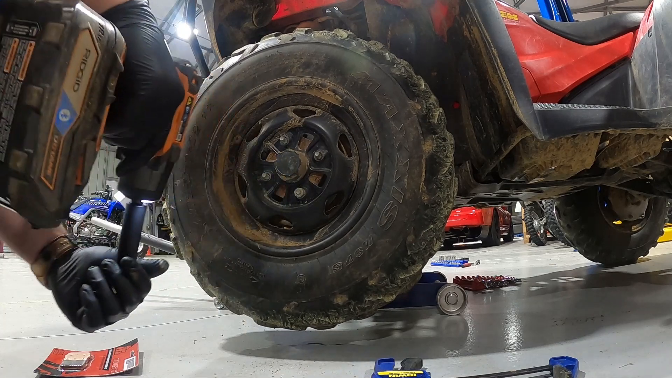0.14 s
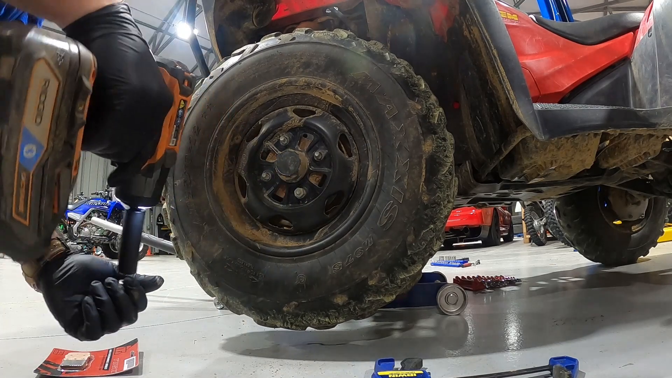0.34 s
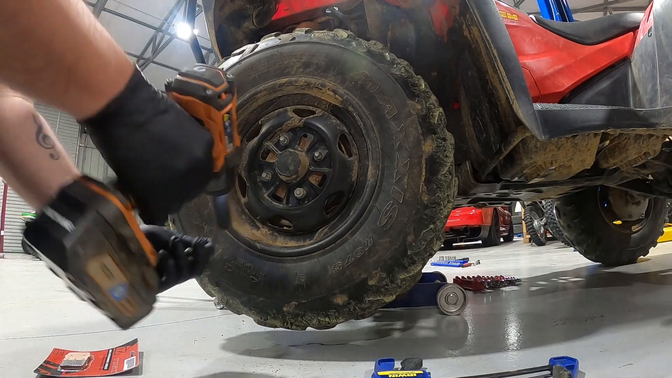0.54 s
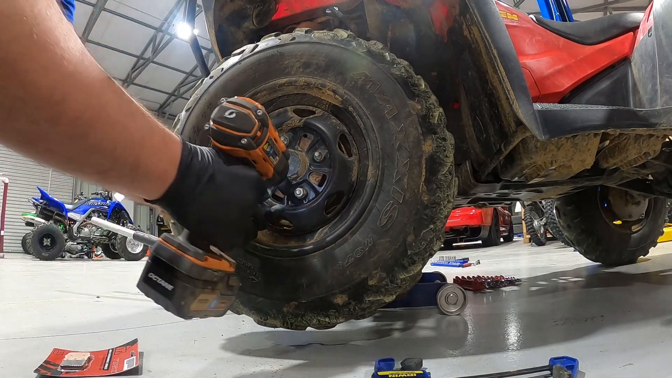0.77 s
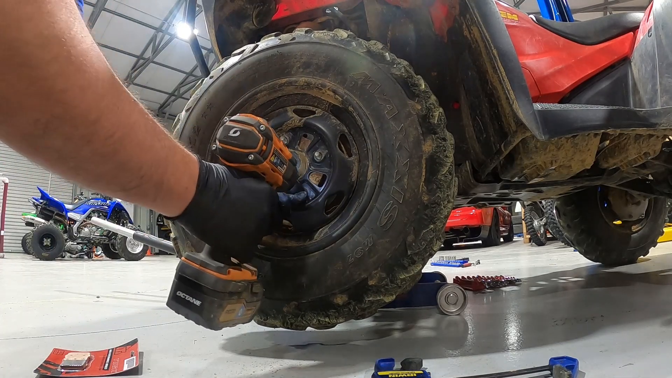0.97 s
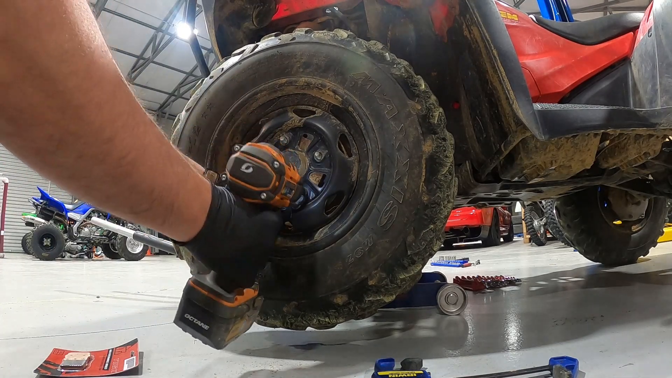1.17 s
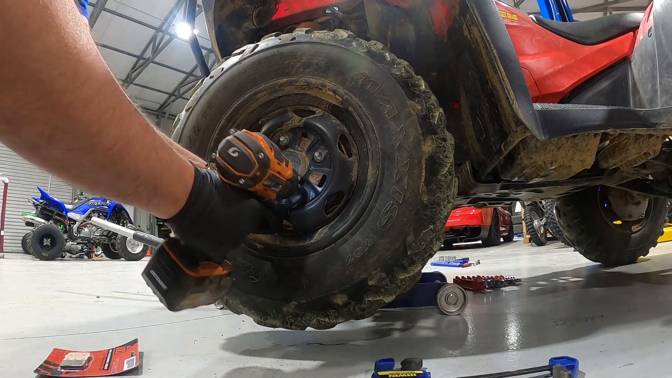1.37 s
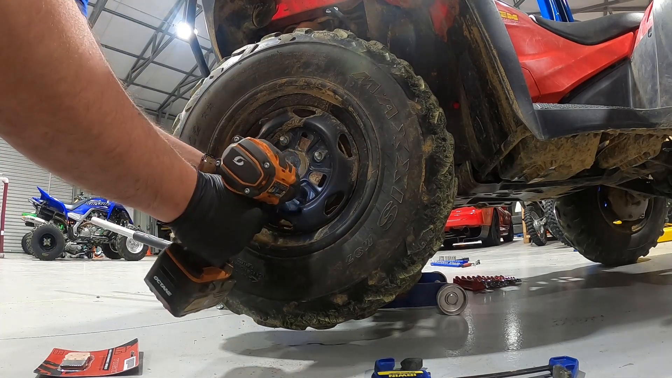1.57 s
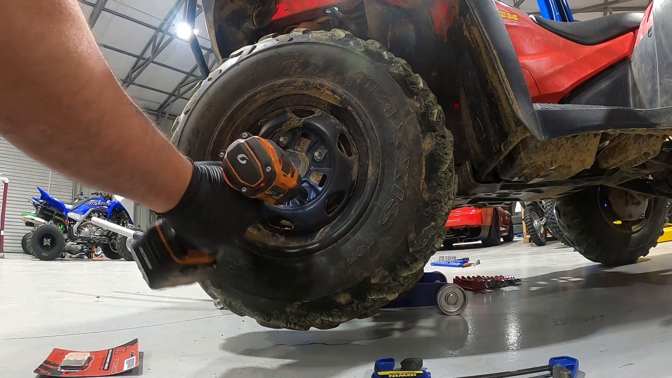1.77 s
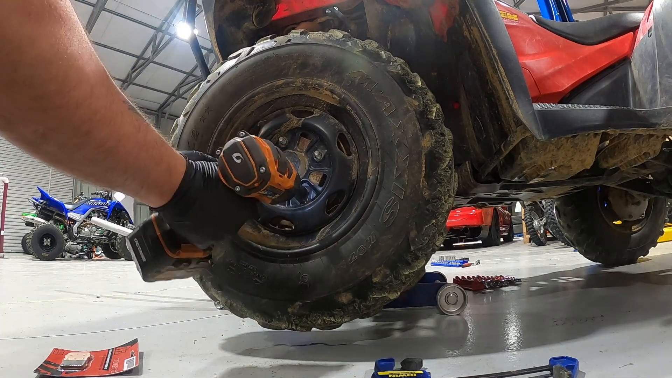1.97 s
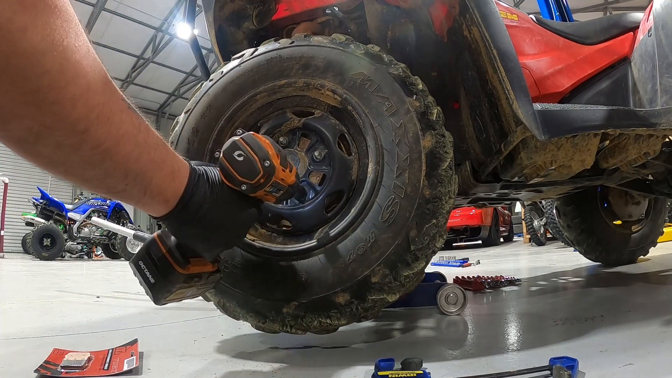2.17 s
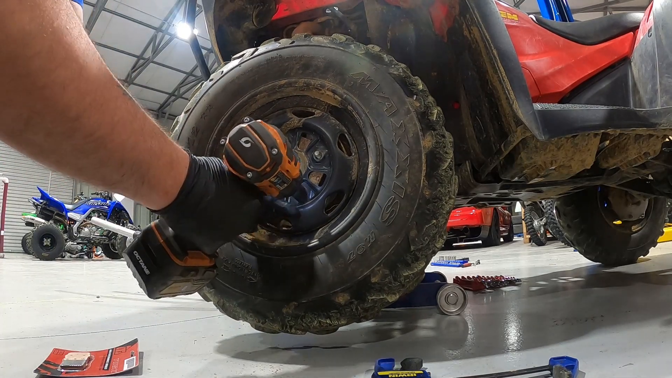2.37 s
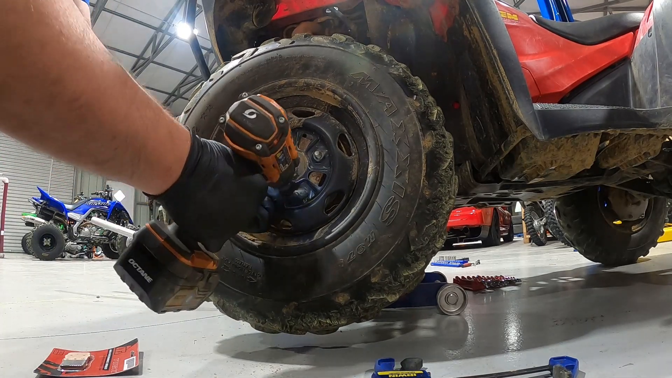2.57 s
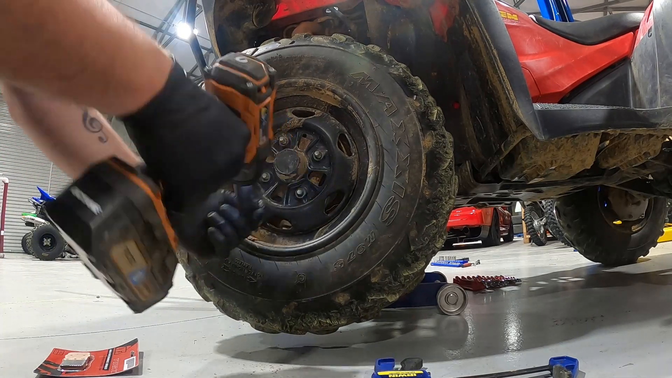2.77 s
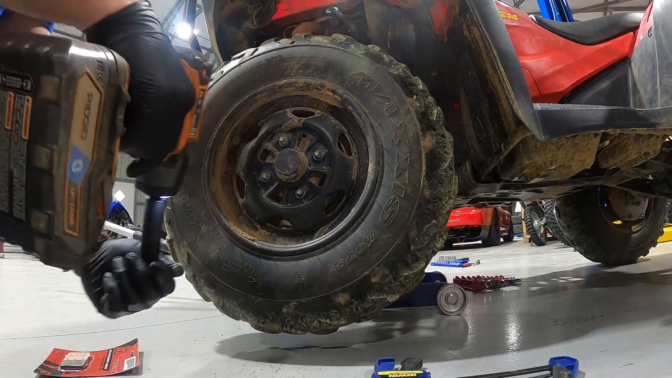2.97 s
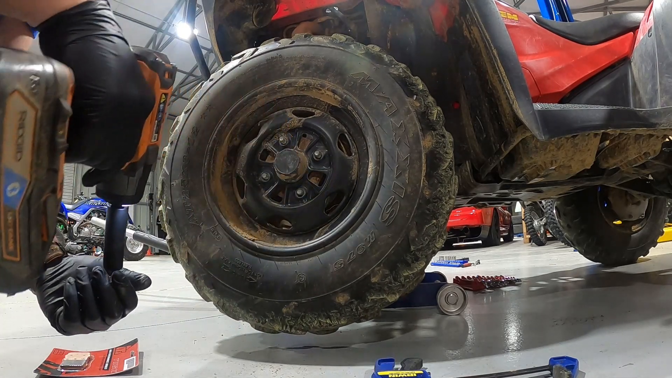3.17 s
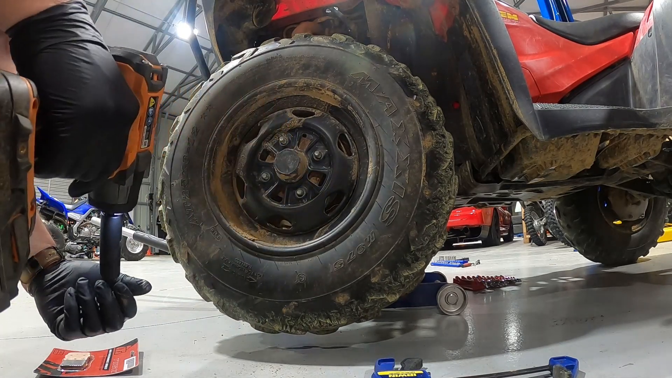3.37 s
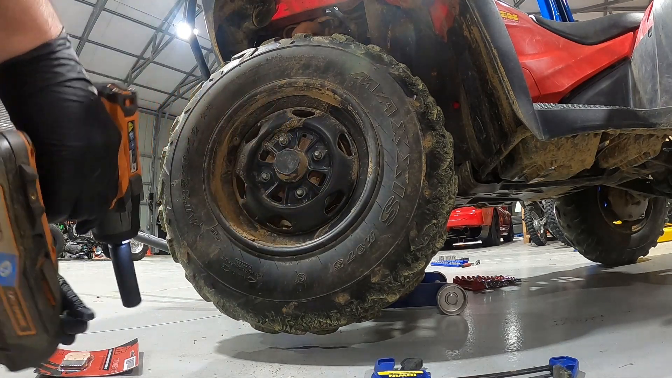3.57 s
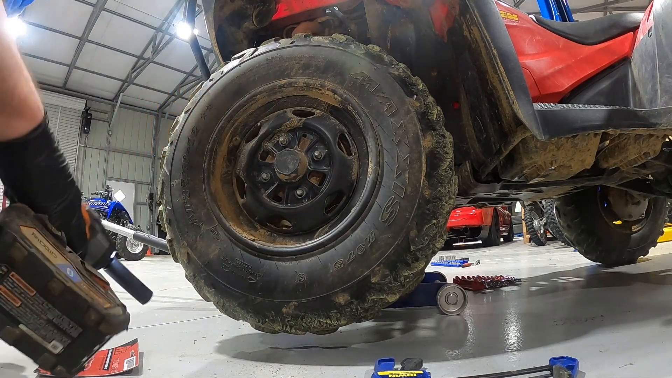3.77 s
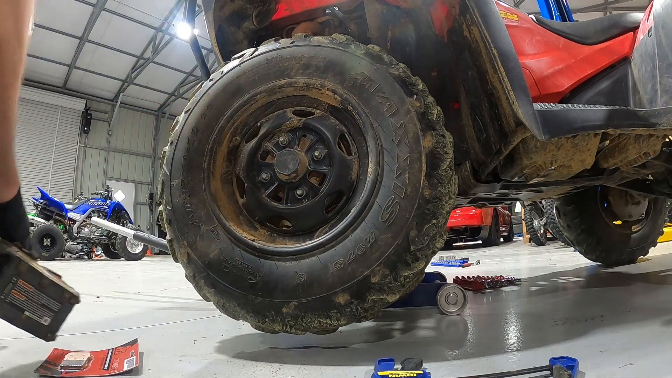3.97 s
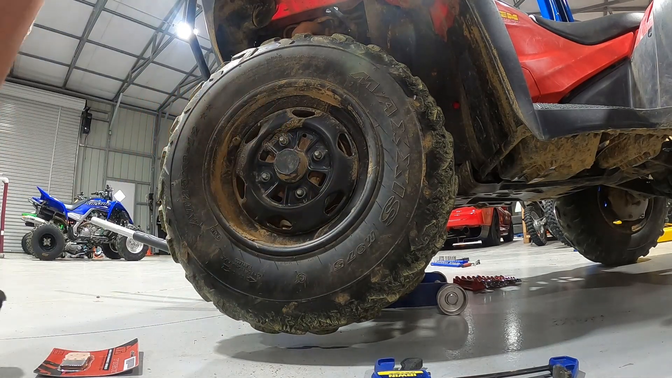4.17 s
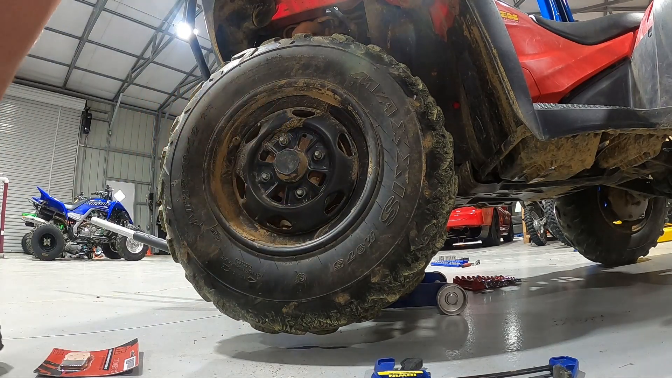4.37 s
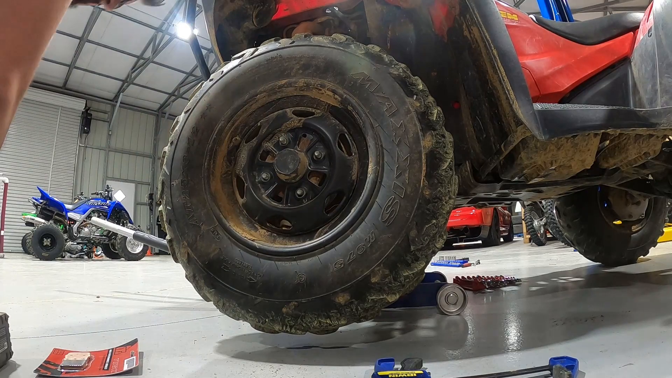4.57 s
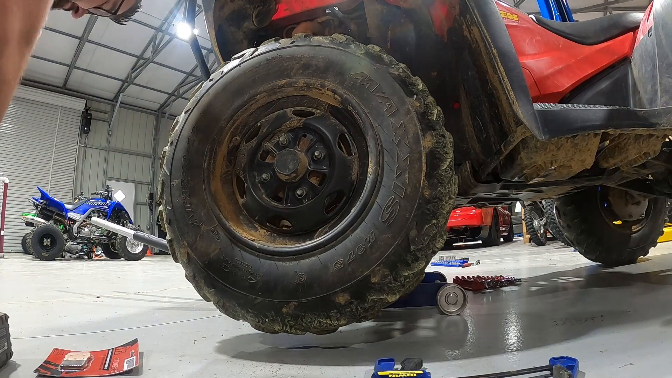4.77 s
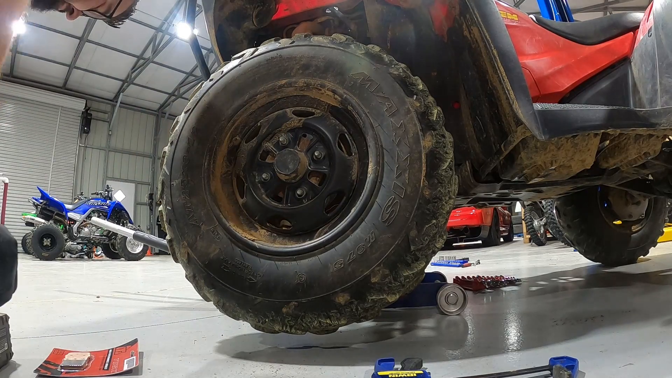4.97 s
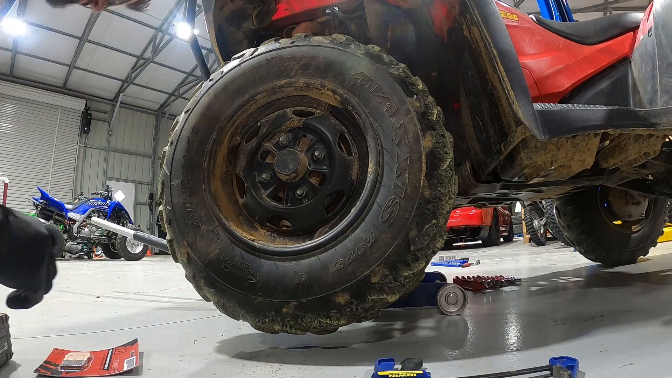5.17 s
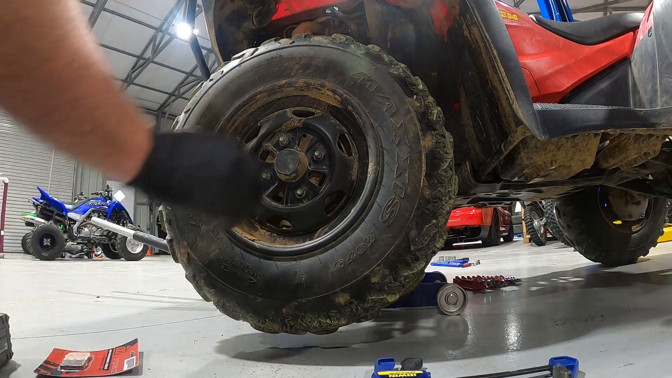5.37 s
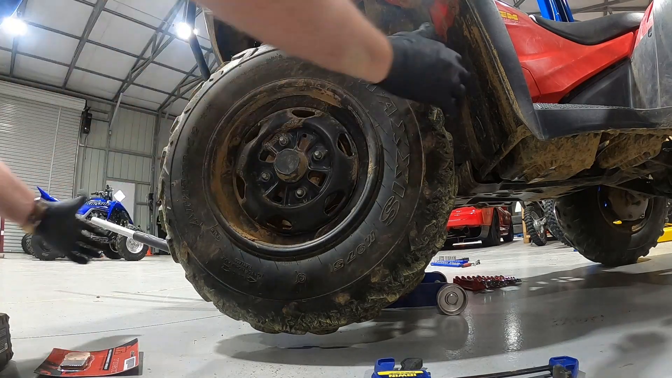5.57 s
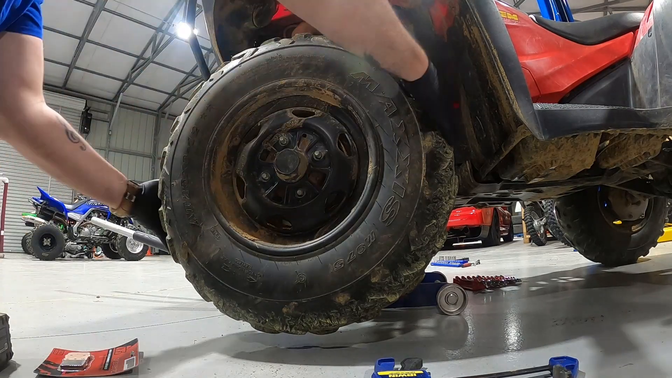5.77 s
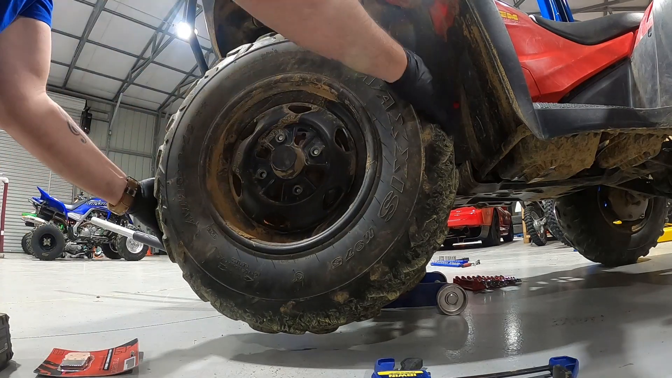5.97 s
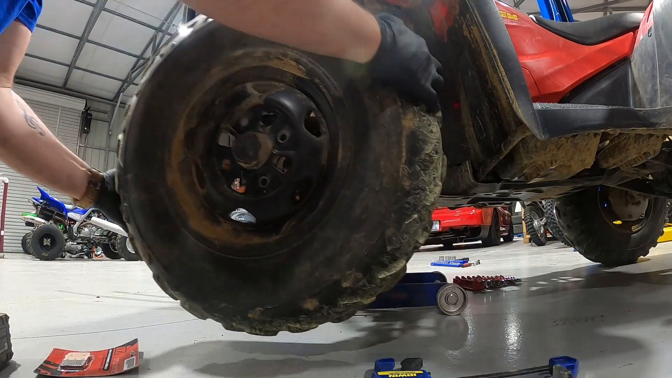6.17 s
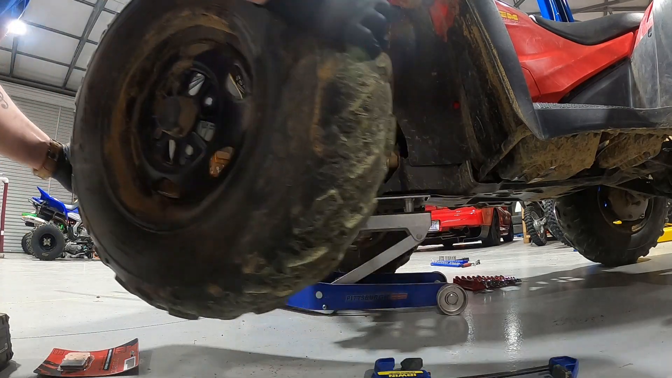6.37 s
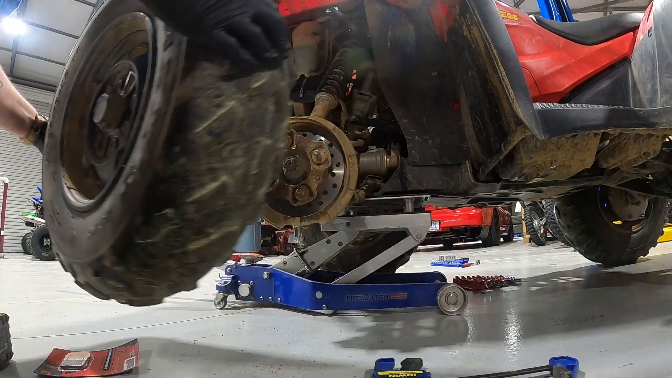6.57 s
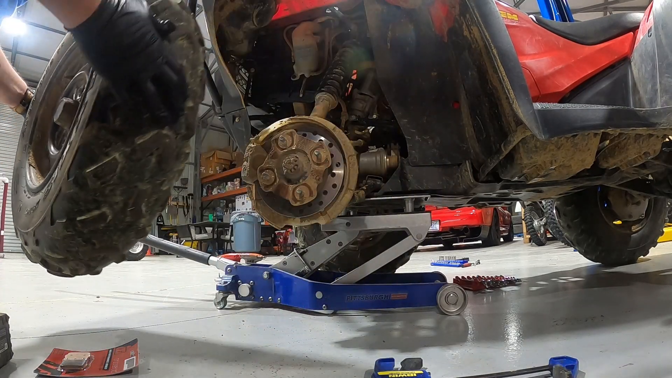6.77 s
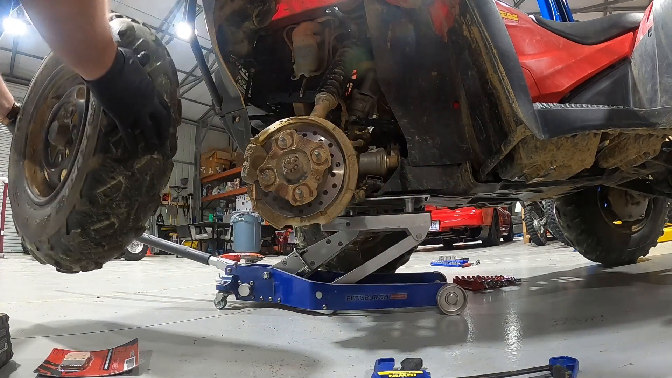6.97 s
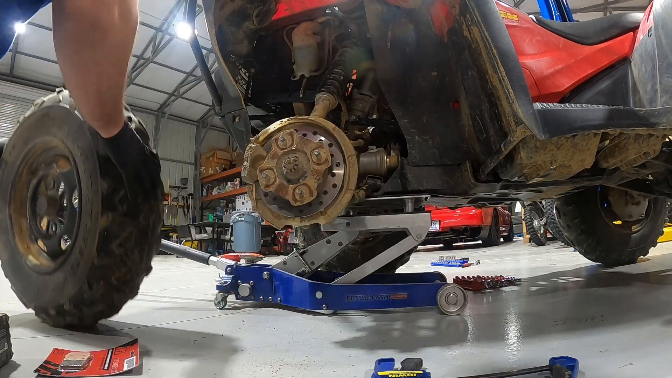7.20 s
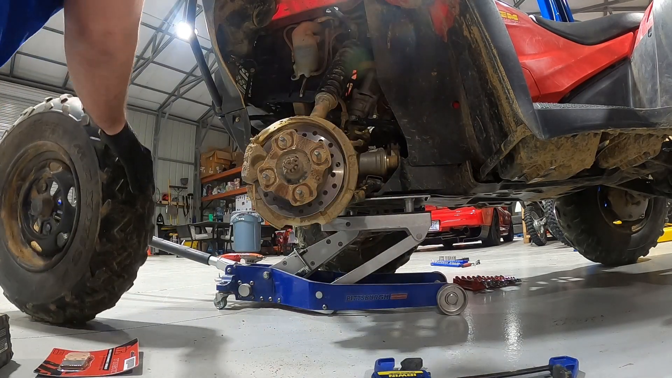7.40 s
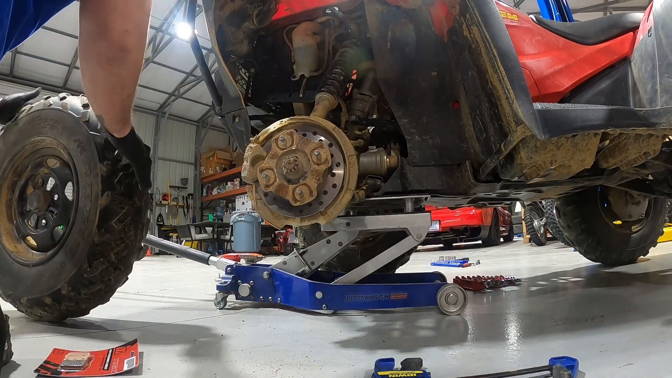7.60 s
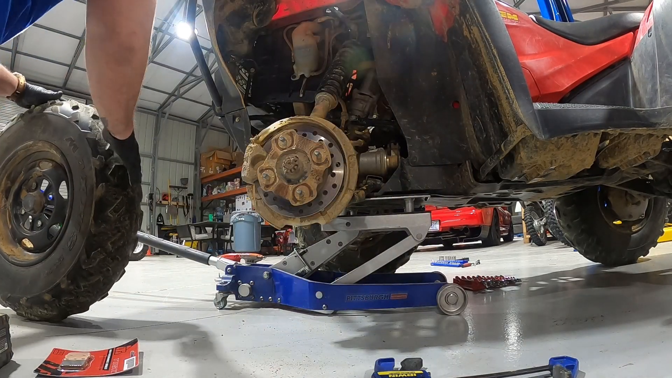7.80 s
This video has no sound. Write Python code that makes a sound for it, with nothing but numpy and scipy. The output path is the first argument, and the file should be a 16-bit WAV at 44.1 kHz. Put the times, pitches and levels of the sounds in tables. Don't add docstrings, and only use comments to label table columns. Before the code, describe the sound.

In a big garage, a cordless impact wrench clatters and gives one short hammering burst, is set down, then a loose wheel rings and thuds down.

```python
import sys
import numpy as np
from scipy import signal
from scipy.fft import rfft, irfft
from scipy.io import wavfile

SR = 44100
rng = np.random.default_rng(int(sys.argv[2]) if len(sys.argv) > 2 else 0)


def output_pcm(signal):
    pcm = np.clip(np.atleast_2d(signal).T, -1, 1) * 32767
    wavfile.write(sys.argv[1], SR, np.round(pcm).astype(np.int16))


def gain_from_db(level_db):
    decades = np.asarray(level_db, float) / 20
    return 10 ** decades


N = 345744

# (frequency [Hz], level [dB], t60 [s])
TYRE = [(101, -5, 0.038), (150, 0.5, 0.042), (194, -3.5, 0.06), (236, -4.5, 0.055), (297, -4.5, 0.046),
        (358, -9, 0.039), (391.5, -10.5, 0.045), (476, -16.5, 0.028), (250, 7.5, 0.016)]
# (frequency [Hz], density [dB/Hz])
SET_DOWN_COLOUR = [(240, -19), (400, -3.5), (888, -11.5), (1190, 2), (1590, -7), (2720, -5), (5250, -23),
                   (6710, -24.5), (15600, -74)]


def in_time(rows, outside=None):
    s, *columns = np.transpose(rows)
    return [np.interp(np.arange(N) / SR, s, c, outside, outside) for c in columns]


def held(start_s, stop_s, rise_s, fall_s):
    t = np.arange(N) / SR
    return -40 * (np.maximum(start_s - t, 0) / rise_s + np.maximum(t - stop_s, 0) / fall_s)


def rub_gain(rows, rise_s, fall_s):
    t = np.arange(N) / SR
    gain = 0
    for s, length_s, db, swell_db in rows:
        stroke_db = db + swell_db * np.clip((t - s) / length_s, 0, 1)
        gain = gain + gain_from_db(stroke_db + held(s, s + length_s, rise_s, fall_s))
    return gain


def wash_gain(rows):
    t = np.arange(N) / SR
    return sum(gain_from_db(db - 60 * np.abs(t - s) / np.where(t > s, t60_s, .03)) for s, db, t60_s in rows)


def rms_one(x):
    return x / np.sqrt(np.mean(x ** 2) + 1e-20)


def drift(rate_hz):
    r = np.exp(-80 * np.pi * rate_hz / SR)
    slow = signal.lfilter([1], [1, -2 * r, r * r], rng.standard_normal(N // 40 + 2002))[2000:]
    return np.interp(np.arange(N) / 40, np.arange(len(slow)), rms_one(slow))


def filtered(x, order, hz, kind="low"):
    return signal.sosfilt(signal.butter(order, hz, kind, fs=SR, output="sos"), x)


def colour(x, spectrum):
    hz, db = np.transpose(spectrum)
    edges_hz = np.geomspace(hz[0], hz[-1], int(2 * np.log2(hz[-1] / hz[0])) + 2)
    gains = gain_from_db(np.interp(np.log(edges_hz[1:] * edges_hz[:-1]) / 2, np.log(hz), db))
    total = 0
    for k, gain in enumerate(gains):
        total = total + (-1) ** k * gain * filtered(x + 1e-18, 2, edges_hz[k:k + 2], "band")
    return total / np.sqrt(np.sum(gains ** 2 * np.diff(edges_hz)) / (SR / 2))


def ring(x, hz, t60_s):
    r = gain_from_db(-60 / (t60_s * SR))
    w = 2 * np.pi * hz / SR
    busy = np.flatnonzero(x)
    span = slice(busy[0], busy[-1] + int(2 * t60_s * SR))
    ringing = np.zeros(len(x))
    ringing[span] = signal.lfilter([0, np.sin(w)], [1, -2 * r * np.cos(w), r * r], x[span] + 1e-18)
    return ringing


def struck(modes, at, peak_db, spread_db):
    total = np.zeros(N)
    for hz, db, t60_s in modes:
        luck = rng.standard_normal((len(at), 2))
        clicks = np.zeros(N)
        clicks[at] = gain_from_db(peak_db + db + spread_db * luck[:, 0]) * np.sign(luck[:, 1] + .6)
        total += ring(clicks, hz, t60_s)
    return total


def rim_crowd(contact):
    # (low edge [Hz], high edge [Hz], level [dB], t60 [s])
    rim_bands = [(2250, 2700, 0, .45), (3100, 3400, -9, .2), (4500, 4750, -16, .15), (5100, 5350, -15, .12),
                 (1300, 1550, -10, .25)]
    t = np.arange(SR // 2) / SR
    response = 0
    for low_hz, high_hz, db, t60_s in rim_bands:
        grain = filtered(rng.standard_normal(len(t)), 2, [low_hz, high_hz], "band")
        response = response + gain_from_db(db - 60 * t / t60_s) * rms_one(grain)
    return signal.fftconvolve(contact, response)[:N]


def blows(events, spectrum, crack_db, body, thud_db, steel=(), ring_db=0, rim_db=-120):
    s, peak_db, low_db, bright_db, contact_ms = np.transpose(events)
    at = (s * SR).astype(int)
    tilts_db = np.clip(0.57 * (bright_db - np.mean(bright_db)), -6, 6)
    t = np.arange(2000) / SR
    contact = np.zeros(N + 2000)
    for i, db, tilt_db, ms in zip(at, peak_db, tilts_db, contact_ms):
        grit = rng.standard_normal(2000)
        dull = filtered(grit, 2, 3800)
        age = 1000 * t / max(ms, .5)
        shape = age ** 1.1 * np.exp(-1.3 * age)
        shape += 0.039 * np.minimum(age, 1) * np.exp(-t / 0.022)
        contact[i:i + 2000] += gain_from_db(db) * shape * (dull * gain_from_db(-tilt_db / 2) + (grit - dull) * gain_from_db(tilt_db))
    contact = contact[:N]

    crack = np.zeros(N)
    span = slice(at.min(), at.max() + 6000)
    crack[span] = gain_from_db(crack_db) * colour(contact[span], spectrum)
    thud = struck(body, at + int(.0015 * SR), peak_db + low_db + thud_db, spread_db=4.0)
    soft_thud = filtered(thud, 2, [0.97 * body[0][0], 700], "band")
    steel_db = peak_db + ring_db + 0.8 * (bright_db - np.max(bright_db))
    total = crack + soft_thud + struck(steel, at + int(0.00087 * SR), steel_db, spread_db=3.0)
    if rim_db > -100:
        total = total + gain_from_db(rim_db) * rim_crowd(contact)
    return total


def pings(rows):
    touch = np.hanning(90)
    t = np.arange(90) / SR
    total = 0
    for s, hz, db, t60_s in rows:
        i = int(s * SR)
        push = np.zeros(N)
        push[i:i + 90] = gain_from_db(db) * touch * np.sin(2 * np.pi * hz * t) / 22
        total = total + ring(push, hz, t60_s)
    return total


def background():
    # (time [s], level [dB])
    air_levels = [(0, -56.5), (.65, -52), (1.1, -44.5), (1.9, -42.5), (1.96, -22), (2.05, -34),
                  (2.12, -37.5), (2.3, -48.5), (2.58, -58), (3.15, -52.5), (3.95, -47), (4.55, -43.5),
                  (5.0, -46), (6.0, -43), (6.6, -47.5), (7.5, -43.5), (7.84, -44.5)]
    # (frequency [Hz], density [dB/Hz])
    rumble_colour = [(8.2, -32.5), (14, -7), (49, -2.5), (85, -5), (199, -12.5), (232, -15.5), (300, -38),
                     (390, -43), (660, -120)]
    hall_colour = [(140, -35.5), (240, -0.5), (308, -4), (419, -1), (650, -13), (1370, -14), (2010, -28),
                   (2600, -25.5), (3380, -52), (5720, -120)]
    rustle_colour = [(400, -19.5), (1300, 4), (1990, -3.5), (2550, 0), (3660, -4.5), (5580, -7.5),
                     (7260, -8.5), (12500, -32), (15600, -45.5)]
    # (start [s], length [s], level [dB], swell [dB])
    glove_strokes = [(0.592, 0.14, -73, 1), (1.08, 0.2, -63, -3), (1.452, 0.18, -51, -9),
                     (3.259, 0.054, -70.5, -10), (3.643, 0.12, -67.5, -1.5), (3.726, 0.12, -59, -8.5),
                     (4.377, 0.083, -47, -13), (4.506, 0.21, -48.5, -13), (4.78, 0.11, -61.5, 7),
                     (5.378, 0.57, -83.5, 11.5), (5.82, 0.37, -57, 1), (6.122, 0.082, -49, -17),
                     (6.441, 0.2, -71, 3.5), (6.96, 0.067, -67, 0), (6.678, 0.083, -59, -6),
                     (6.865, 0.047, -63.5, 1), (7.18, 0.13, -56, 7), (7.36, 0.39, -57.5, -6.5),
                     (7.824, .05, -57.5, 1)]
    # (time [s], level [dB], t60 [s])
    wall_washes = [
        (2.57, -53.5, 0.53),
        (4.385, -43, 0.5),
        (4.525, -41, 0.4),
        (4.575, -40, 0.6),
        (7.33, -52, 0.57),
        (7.54, -56, 0.31),
    ]
    rumble_db, = in_time(air_levels)
    t = np.arange(N) / SR
    rumble = gain_from_db(rumble_db + 1.2 * drift(4)) * colour(rng.standard_normal(N), rumble_colour)
    hall_db = -57.5 + 0.93 * (rumble_db + 46.0)
    hall = gain_from_db(hall_db) * colour(rng.standard_normal(N), hall_colour)

    grains = rng.standard_normal(N) * gain_from_db(2.5 * drift(90))
    rustle_gain = gain_from_db(-74 + 0.44 * (rumble_db + 51)) + rub_gain(glove_strokes, 0.044, 0.132)
    rustle = rustle_gain * rms_one(colour(grains, rustle_colour))

    last_run = gain_from_db(-56.5 - 60 * t / 0.83)
    echo = (last_run + wash_gain(wall_washes)) * colour(rng.standard_normal(N), SET_DOWN_COLOUR)
    tone = gain_from_db(-78 + 4 * drift(30)) * np.sin(2 * np.pi * 7970 * t)
    return rumble + hall + rustle + echo + tone


def afterglow():
    # (start [s], length [s], level [dB], swell [dB])
    scuff_strokes = [(0.991, 0.019, -69, 20), (1.647, 0.018, -62, 1), (7.193, .08, -59.5, 2),
                     (7.28, 0.026, -52.5, 5.5), (7.348, 0.017, -55, -3), (7.815, .03, -61.5, 0)]
    # (frequency [Hz], density [dB/Hz])
    scuff_colour = [(1500, -13), (2500, -0.5), (4200, 2), (5600, 5), (8000, -6), (10500, -15), (15000, -40)]
    # (time [s], level [dB], t60 [s])
    floor_washes = [
        (6.13, -45, 0.91),
        (7.335, -43, 1),
        (7.54, -57, 0.37),
        (7.66, -66, .3),
    ]
    # (frequency [Hz], density [dB/Hz])
    floor_colour = [(300, -9), (600, 3), (1000, 5), (1400, 6), (2100, -15), (3200, -46), (6000, -45)]
    slide = rub_gain(scuff_strokes, 0.01, 0.04) * colour(rng.standard_normal(N), scuff_colour)
    return slide + wash_gain(floor_washes) * colour(rng.standard_normal(N), floor_colour)


def ticks():
    # (time [s], peak [dB], brightness [dB])
    tick_events = [(0.046, -44.5, -10.5), (0.586, -41.5, -25), (0.679, -53, 1), (0.719, -47, -21),
                   (2.708, -40.5, -17), (2.939, -49, 1), (3.104, -43.5, -30), (3.271, -37.5, 11),
                   (3.483, -37.5, -29), (3.643, -45.5, -21.5), (3.721, -39, -10), (3.808, -43, 5),
                   (4.069, -43.5, -17.5), (4.321, -43.5, -22), (4.777, -33, -23), (4.835, -45.5, 0),
                   (4.866, -44.5, 0), (5.836, -41, -39), (5.9, -33.5, -24), (6.444, -61, 0),
                   (6.603, -63, 5), (6.685, -41.5, 3), (6.808, -60, 0), (6.863, -57, -12), (7.562, -47, 0),
                   (6.961, -55, 7), (7.828, -47.5, -5)]
    # (frequency [Hz], density [dB/Hz])
    tick_colour = [(710, -16), (1200, -23), (1890, -1.5), (3990, -0.5), (5490, -8), (7630, -2.5),
                   (14000, -65)]
    contact_ms = 2.2
    rows = [(s, db, 0, bright_db, contact_ms) for s, db, bright_db in tick_events]
    return blows(rows, tick_colour, crack_db=-2.5, body=TYRE, thud_db=-50.0)


def set_down():
    # (time [s], peak [dB], thud re peak [dB], brightness [dB], contact [ms])
    landings = [(4.378, -24, -4.5, -19, 4.6), (4.516, -18, -2, -32, 4.6), (4.566, -16, -10.5, -23, 3.3),
                (4.601, -35, -10, -19.5, 2.2), (4.545, -34, 0, -24, 3.7), (4.583, -34.5, 10, -18, 2.6),
                (4.628, -40, 4, -19, 2.7)]
    return blows(landings, SET_DOWN_COLOUR, crack_db=7.0, body=TYRE, thud_db=-1.0)


def hub():
    # (time [s], peak [dB], thud re peak [dB])
    slips = [(5.9, -44.5, 8), (5.992, -61, 11), (6.033, -38, 6.5), (6.054, -27.5, 2), (6.064, -17, 6.5),
             (6.074, -13, -2), (6.083, -12.5, 2), (6.091, -10.5, 2.5), (6.098, -8, -2.5), (6.103, -9.5, 1),
             (6.11, -11, -12.5), (6.116, -9, -3), (6.122, -16.5, -9), (6.13, -23, 3), (6.137, -34, -1),
             (6.146, -28, 13.5), (6.158, -36, 14)]
    # (frequency [Hz], density [dB/Hz])
    hub_colour = [(240, -33), (400, -11), (569, 15.5), (1080, 4.5), (1210, -11.5), (1380, 4), (2370, 3),
                  (3580, -16), (4050, -12.5), (11300, -32), (15600, -78.5)]
    # (frequency [Hz], level [dB], t60 [s])
    loose_rim_modes = [(691, -6, .3), (810, -7, 0.33), (1050, -7, 0.11), (1378, -4.5, 0.46),
                       (1430, -29, 0.31), (1413, 7, 0.11), (1886, -12, 0.16), (2650, -25, .4),
                       (2740, -22, .3), (3460, -3, 0.055), (3590, -3.5, .04), (4021, -29, 0.15),
                       (4597, -17, 0.12), (5502, -16, 0.091)]
    contact_ms = 2.34
    rows = [(s, db, low_db, 0.24 * db, contact_ms) for s, db, low_db in slips]
    return blows(rows, hub_colour, crack_db=0.0, body=TYRE[1:], thud_db=-5.5,
                 steel=loose_rim_modes, ring_db=-19.5)


def bounce():
    # (time [s], peak [dB], thud re peak [dB], brightness [dB], contact [ms])
    bounces = [(7.3185, 2.5, -11, -18, 0.6), (7.322, -3.5, -13, -21, 0.98), (7.328, -5.5, -17, -22, 1),
               (7.359, -27.5, 16, -28, 1.2), (7.517, -14, 3.5, -52, 0.81), (7.531, -5, -7.5, -27, 0.96),
               (7.535, -10.5, -16, -31, 1.5), (7.616, -27, -14, -74.5, 1.1), (7.657, -25.5, 6.5, -55, 1.4),
               (7.686, -33.5, 10, -44, 1.04)]
    # (frequency [Hz], density [dB/Hz])
    bounce_colour = [(150, -46), (250, 0), (544, -7.5), (647, 4.5), (1230, -8), (1700, -12), (2820, -30),
                     (7680, -56), (15600, -78)]
    # (frequency [Hz], level [dB], t60 [s])
    floor_tyre_modes = [(37.6, -3, 0.21), (56, -6.5, 0.19), (81.3, -4, 0.17), (103, -6, 0.14),
                        (168, -5, 0.055)]
    return blows(bounces, bounce_colour, crack_db=-2.0, body=floor_tyre_modes, thud_db=-9.5)


def wheel_pings():
    # (time [s], frequency [Hz], peak [dB], t60 [s])
    wheel_knocks = [(5.899, 150, -31.5, 0.11), (5.992, 119, -24.5, 0.045), (6.034, 150, -28.5, 0.098),
                    (6.066, 197, -30, .06), (6.084, 1060, -15.5, 0.071), (6.09, 3560, -22.5, .04),
                    (6.104, 1462, -14, 0.07), (6.108, 3590, -33, .04), (6.12, 1378, -30, 0.48),
                    (6.126, 3590, -28, .03), (6.127, 4021, -48, 0.225), (6.128, 5502, -49, .11),
                    (6.129, 7000, -46, 0.14), (6.13, 2649, -50, 0.5), (6.133, 4600, -53, .2),
                    (6.135, 3451, -45, .1), (7.321, 700, -17, 0.046), (7.322, 1400, -12, 0.0075),
                    (7.617, 944, -28.5, .027), (7.657, 730, -28, 0.034)]
    return pings(wheel_knocks)


def tool_pings():
    # (time [s], frequency [Hz], peak [dB], t60 [s])
    tool_knocks = [(1.006, 1430, -16.5, 0.024), (1.008, 2400, -19, 0.029), (1.499, 369, -15, 0.039),
                   (1.4995, 1390, -19, 0.018), (1.5, 5140, -17.5, 0.022), (1.5005, 520, -18.5, 0.026),
                   (1.501, 4624, -52.5, 0.33), (1.799, 300, -11.5, 0.048), (1.6, 2500, -19.5, 0.01496),
                   (1.95, 1500, -14, 0.021), (1.969, 240, -14.5, .02), (1.981, 280, -10, 0.013),
                   (1.99, 45, -14, .2), (2.007, 240, -11, .02), (2.085, 189, -30, 0.39),
                   (2.15, 250, -33.5, 0.24), (2.405, 660, -29.5, 0.11), (2.566, 1450, -50, 0.18),
                   (2.574, 3300, -18, 0.011), (2.591, 3200, -25, 0.014), (4.379, 1340, -28, .02)]
    return pings(tool_knocks)


def socket():
    # (time [s], peak [dB], thud re peak [dB], brightness [dB], contact [ms])
    socket_knocks = [(1.003, -3.5, -12.5, -25.5, 2.9), (1.068, -27.5, -4, -20.5, 3),
                     (1.106, -13.5, -12, -12, 2.7), (1.194, -4, -6, -17.5, 2.7),
                     (1.25, -27, -6.5, -20.5, 3.5), (1.437, -34.5, 8.5, -23, 4.3),
                     (1.449, -15.5, -9, -20, 2.7), (1.454, -30.5, 11.5, -24, 3),
                     (1.498, -7, 0.5, -12.5, 2.7), (1.542, -25, -14.5, -31, 3.2),
                     (1.589, -29, 6.5, -19.5, 2), (1.635, -33.5, -0.5, -30.5, 3),
                     (1.713, -36, -9.5, -15.5, 1.5), (1.664, -26, -21.5, -12.5, 1.5),
                     (1.754, -32, -7, -16.5, 1.7), (1.796, -4, -14.5, -15, 2.2),
                     (1.803, -24, -10, -20.5, 4), (1.8305, -12, -26, -21, 1.1),
                     (1.852, -22.5, -16, -30.5, 3.2), (1.924, -8, -13.5, -21, 1.5),
                     (1.929, 4, -8.5, -20.5, 3.5)]
    # (frequency [Hz], density [dB/Hz])
    socket_colour = [(240, -29), (400, -8), (596, -11.5), (1130, -15), (1410, -13), (2000, -19.5),
                     (2260, -11), (3220, -12), (3990, -28), (5250, -25), (15600, -76.5)]
    # (frequency [Hz], level [dB], t60 [s])
    socket_modes = [(1440, -8.5, .02), (2270, -2, .03), (2610, -1, .03), (3180, 0.5, .025),
                    (4790, -11.5, .025), (5200, -10, .02)]
    return blows(socket_knocks, socket_colour, crack_db=-9.0, body=TYRE, thud_db=-5.5,
                 steel=socket_modes, ring_db=-12.5, rim_db=-50.0)


def motor():
    # (time [s], frequency [Hz])
    speed_curve = [(2.08, 1291), (2.12, 1414), (2.22, 1521), (2.38, 1544), (2.486, 1582), (2.493, 1506),
                   (2.508, 1374), (2.529, 1090), (2.556, 638)]
    # (time [s], pole [dB], double [dB], fourfold [dB])
    brake_levels = [(2.488, -34, -40.5, -61), (2.493, -18.5, -22.5, -55), (2.504, -21, -29, -50),
                    (2.511, -27, -25.5, -44), (2.518, -31, -21, -42), (2.527, -31, -22, -48),
                    (2.534, -36, -31, -48), (2.548, -40.5, -37, -26), (2.554, -38, -31, -26),
                    (2.562, -72, -60, -60)]
    # (time [s], level [dB])
    load_levels = [
        (1.745, -61.5),
        (1.756, -38.5),
        (1.79, -38.5),
        (1.825, -47.5),
        (1.85, -38),
        (1.89, -29.5),
        (1.925, -25.5),
        (1.96, -32.5),
        (2.07, -35),
        (2.1, -63),
    ]
    # (frequency [Hz], density [dB/Hz])
    loaded_colour = [(290, -42.5), (500, -21), (1220, -16), (2690, -1.5), (5000, -24), (6400, -34),
                     (7600, -27.5), (9000, -36.5), (11200, -54.5), (15600, -90.5)]
    free_colour = [(180, -36), (300, -17), (384, -15), (454, -31.5), (674, 5), (986, -13.5), (1570, 6),
                   (2530, -3.5), (3410, -1), (4370, -5), (6600, -8.5), (7540, -20.5), (15600, -52.5)]
    # (frequency [Hz], width [Hz], level [dB])
    housing_modes = [(3520, 91, -4.5), (1340, 30, -22), (4910, 330, -13.5), (8520, 300, -18)]
    # (multiple of pole pitch, level [dB])
    chatter_orders = [(1.088, -23.5), (2.19, -1)]
    free_s, brake_s, stop_s = 2.099, 2.49, 2.562
    mesh_order, shaft_order = 4.74, .25
    t = np.arange(N) / SR
    hz, = in_time(speed_curve)
    turn = 2 * np.pi * np.cumsum(hz * (1 + .002 * drift(60))) / SR

    braking = t > brake_levels[0][0]
    brake_pole_db, brake_double_db, fourfold_db = in_time(brake_levels, -120)
    pole_db = np.where(braking, brake_pole_db, -38.5 + held(free_s + 0.053, stop_s, .4, .1))
    double_db = np.where(braking, brake_double_db, -43 + 18.5 * (t - free_s))
    mesh_db = -42.5 + held(free_s + 0.096, brake_s + 0.0082, 0.064, 0.12)
    shaft_db = -49 + held(free_s + 0.15, brake_s, .5, 0.062)
    orders = [(1, pole_db), (2, double_db), (4, fourfold_db), (mesh_order, mesh_db), (shaft_order, shaft_db)]
    whine = 0
    for k, db in orders:
        waver_db = np.where(braking, .7, 2.2) * drift(38)
        rough = 1 + .1 * braking * drift(150)
        whine = whine + gain_from_db(db + 3 + waver_db) * rough * np.sin(k * turn)
    whine = whine * gain_from_db(held(free_s, stop_s, 0.011, 0.012))

    teeth = rng.standard_normal(N) * gain_from_db(2.5 * np.sin(shaft_order * turn) + 1.2 * drift(70))
    cogs_per_s = 103
    cog_db = 5.5 * np.cos(2 * np.pi * cogs_per_s * (t - 1.853) + .4 * drift(11))
    loaded = gain_from_db(in_time(load_levels, -120)[0] + cog_db) * rms_one(colour(teeth, loaded_colour))

    boxed = sum(gain_from_db(db) * rms_one(ring(teeth, f, 2.2 / width_hz)) for f, width_hz, db in housing_modes)
    boxed += sum(gain_from_db(db + 3.0) * drift(150) * np.sin(k * turn) for k, db in chatter_orders)
    run_up_db = -10.5 * np.clip(1 - (t - free_s) / 0.14, 0, 1)
    free_db = -28 + run_up_db + held(free_s, stop_s, .01, 0.054)
    free = gain_from_db(free_db) * rms_one(colour(teeth, free_colour) + boxed)

    whistle_db = -54.5 + held(1.76, 2.3, .03, .04) - 8.0 * (t > load_levels[6][0])
    whistle = gain_from_db(whistle_db) * gain_from_db(2.5 * drift(60)) * (.8 + .45 * drift(400)) * np.sin(2 * np.pi * 10020 * t)
    whistle *= 1 + .15 * np.sin(2 * np.pi * 4100 * t)
    return whine + loaded + free + whistle


def hammer():
    # (time [s], peak [dB], thud re peak [dB])
    hammer_strikes = [
        (1.958, 0, -10.5),
        (1.987, 0, -10),
        (2.0105, -4.5, -14),
        (2.031, -2.5, -14),
        (2.049, -4, -14),
        (2.067, -3.5, -12.5),
    ]
    # (time [s], peak [dB], thud re peak [dB], brightness [dB], contact [ms])
    loose_play = [(2.246, -33, 1, -14.5, 4.2), (1.938, -9, -2.5, -22, 3), (1.949, -6.5, -15, -23, 4.3),
                  (2.41, -44, 4, -21, 6), (1.967, -12.5, -3.5, -12.5, 3.8), (2, -30, 3.5, -13, 7.1),
                  (2.489, -29.5, -35, -20, 1.6), (2.559, -17.5, -24, -12, 3), (2.564, -17, -38, -14, 0.68),
                  (2.576, -33, -22, -20, 1.04), (2.593, -38, -38, -20, 2.2)]
    # (frequency [Hz], density [dB/Hz])
    hammer_colour = [(290, -30.5), (500, 0), (915, -6.5), (1390, -4.5), (1700, -3.5), (2330, 5.5),
                     (2770, -12), (3250, -2), (3750, -1.5), (5150, -2), (5530, -6), (8900, -14.5),
                     (15600, -48)]
    # (frequency [Hz], level [dB], t60 [s])
    anvil_modes = [(2370, -3.5, .02), (3370, -4, 0.031), (4250, -3, .02), (4620, -0.5, .03),
                   (4950, -1, .04), (5130, -3.5, .05), (5230, -5, .035), (5860, -8.5, .02),
                   (8900, -10, .025)]
    strike_ms, cam_ms, cam_lead_s = 1.9, 6, 0.0084
    strikes = [(s, db, low_db, -8, strike_ms) for s, db, low_db in hammer_strikes]
    cams = [(s - cam_lead_s, db - 13, low_db + 5.5, -18, cam_ms) for s, db, low_db in hammer_strikes]
    return blows(strikes + cams + list(loose_play), hammer_colour, crack_db=-6.0, body=TYRE, thud_db=-3.0,
                 steel=anvil_modes, ring_db=-13.5, rim_db=-63.5)


def garage(x):
    t60_s, wall_cut_hz = 0.77, 520
    t = np.arange(SR) / SR
    white = rng.standard_normal(SR)
    dull = filtered(white, 1, wall_cut_hz) * gain_from_db(-60 * t / t60_s)
    bright = 0.25 * white * gain_from_db(-130 * t / t60_s)
    tail = (dull + bright) * (1 - np.exp(-t / .006))
    return signal.fftconvolve(x, tail / np.sqrt(np.sum(tail ** 2)))[:N]


def ports(mid):
    # (frequency [Hz], level re sum [dB])
    side_colour = [(60, -22), (110, -29), (200, -25.5), (380, -17.5), (700, -11.5), (1290, -10),
                   (2380, -8.5), (4400, -5), (8120, 0), (15000, -0.5)]
    # (time [s], level [dB])
    width_levels = [(0, -50.5), (1.93, -25.5), (2.08, -12.5), (2.1, -19.5), (4.3, -23), (4.9, -6.5),
                    (7.84, -1)]
    hz = np.fft.rfftfreq(N, 1 / SR) + 1
    side_hz, side_db = np.transpose(side_colour)
    apart = gain_from_db(np.interp(np.log(hz), np.log(side_hz), side_db))
    middle = rfft(mid)
    scattered = middle * np.exp(1j * (np.pi / 2 + .9 * np.sin(hz / 23)))
    high = 1 / (1 + (11630 / hz) ** 40)
    wide = gain_from_db(in_time(width_levels)[0]) * irfft(scattered * apart * (1 - high), N)
    treble = irfft((scattered - .3 * middle) * high, N)
    return np.array([mid + wide + treble, mid - wide - treble])


def scene():
    behind = background() + afterglow()
    aside = set_down()
    wheel = hub() + wheel_pings() + bounce()
    tool = ticks() + tool_pings() + socket() + motor() + hammer()
    sent = tool + gain_from_db(2.0) * aside + gain_from_db(-1.5) * wheel
    echo = filtered(garage(sent), 2, 330, "high")
    return ports(tool + aside + wheel + gain_from_db(-18) * echo + behind)


def low_pass(x):
    return signal.sosfilt(signal.butter(12, 16030, fs=SR, output="sos"), x)


def record(dry):
    rounded = .92 * np.tanh(dry / .92)
    cut = signal.sosfilt(signal.cheby2(12, 70, 16300, fs=SR, output="sos"), rounded)
    return low_pass(cut)


dry = scene()
out = record(dry)
output_pcm(out)
```